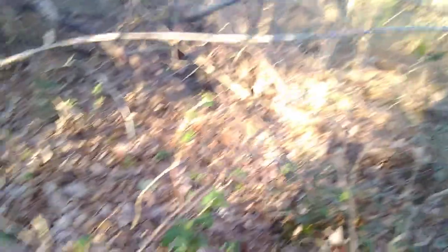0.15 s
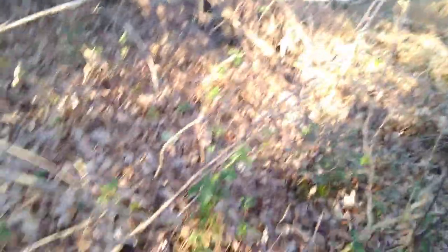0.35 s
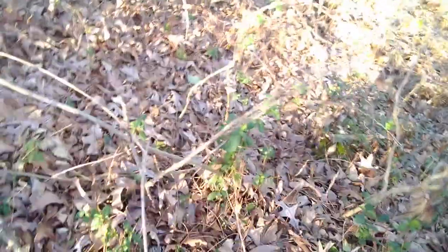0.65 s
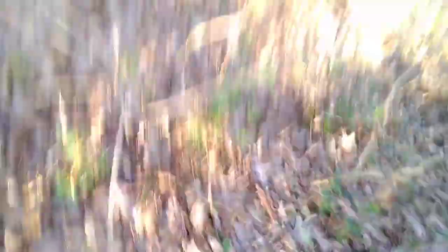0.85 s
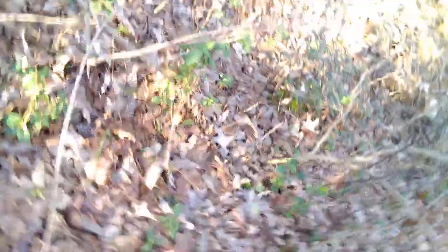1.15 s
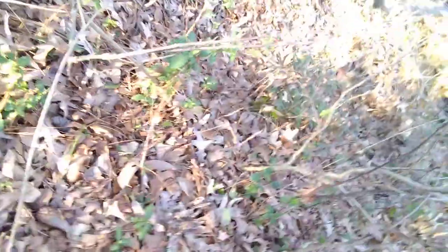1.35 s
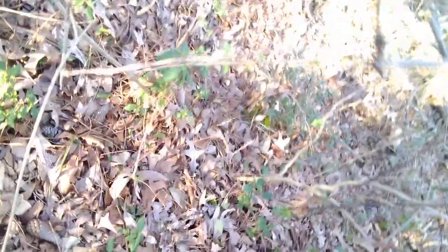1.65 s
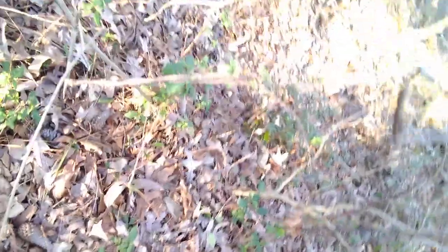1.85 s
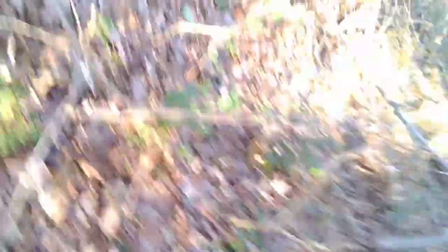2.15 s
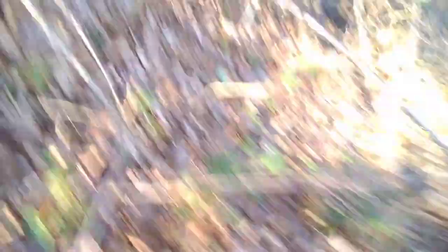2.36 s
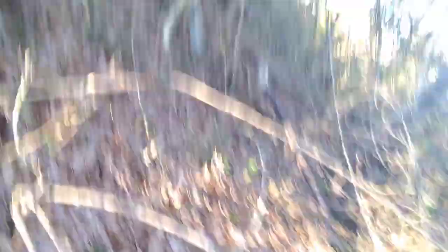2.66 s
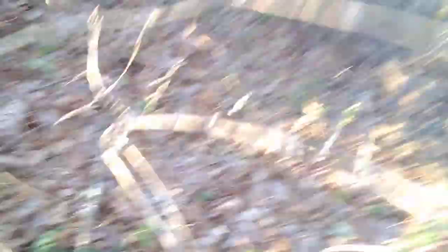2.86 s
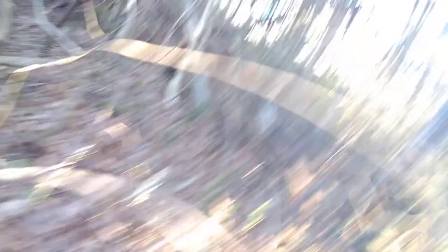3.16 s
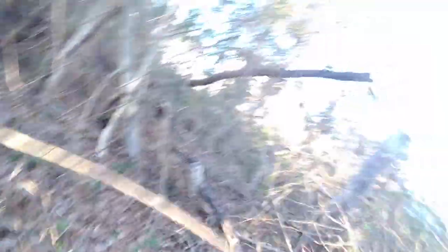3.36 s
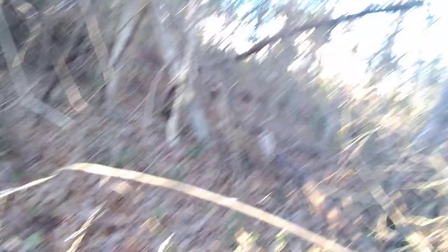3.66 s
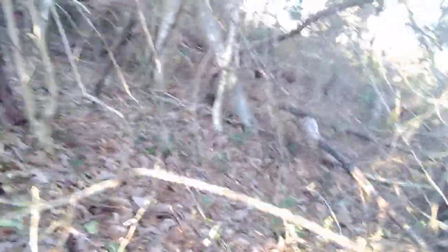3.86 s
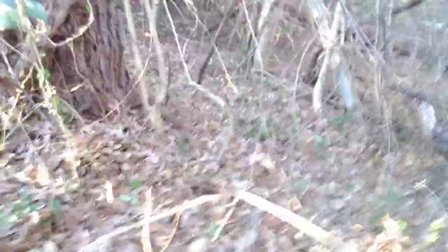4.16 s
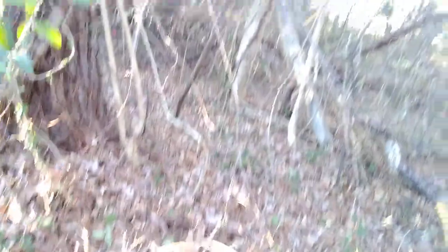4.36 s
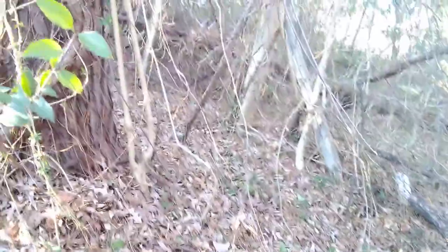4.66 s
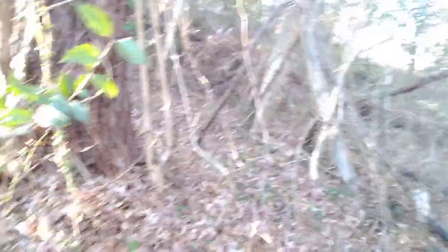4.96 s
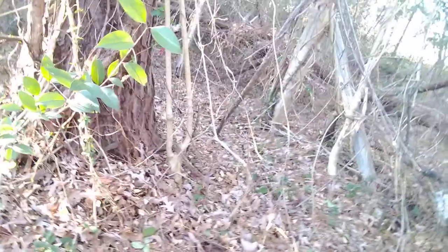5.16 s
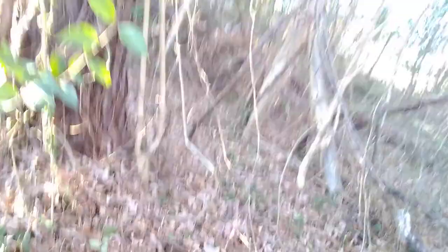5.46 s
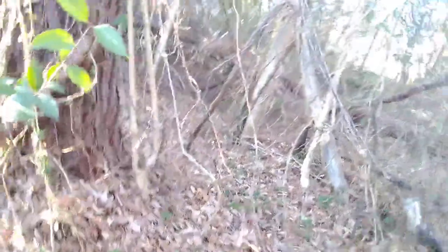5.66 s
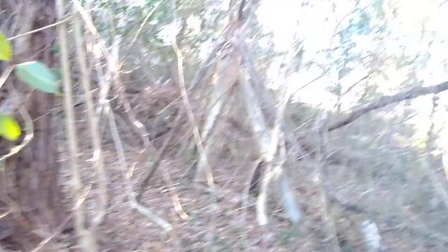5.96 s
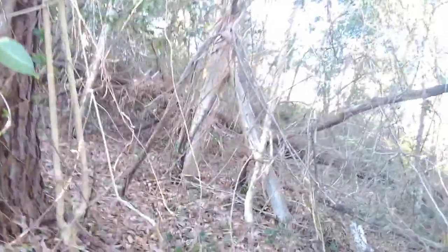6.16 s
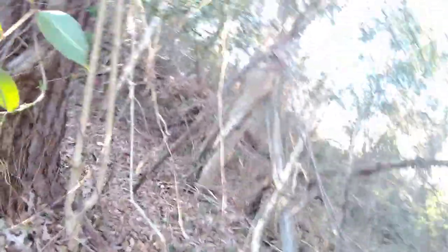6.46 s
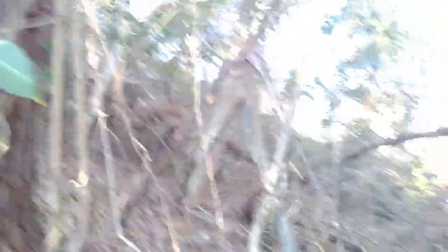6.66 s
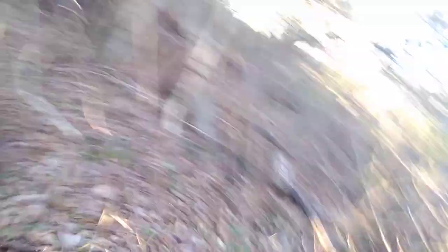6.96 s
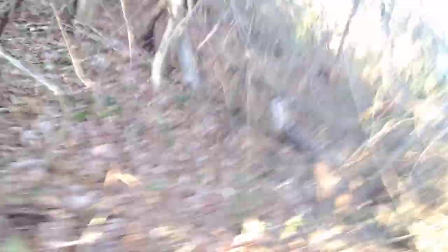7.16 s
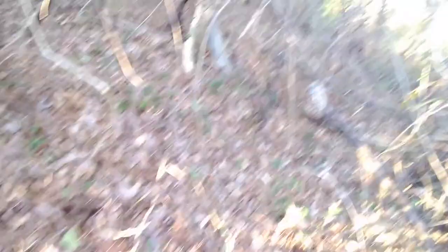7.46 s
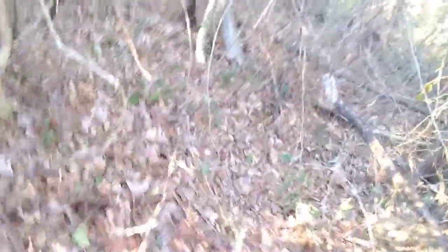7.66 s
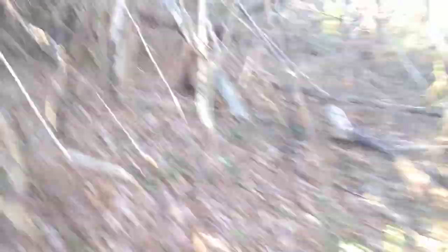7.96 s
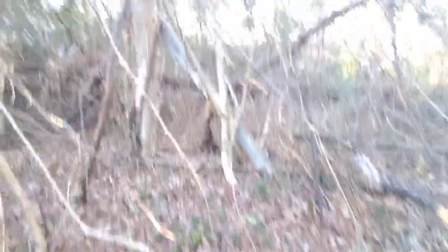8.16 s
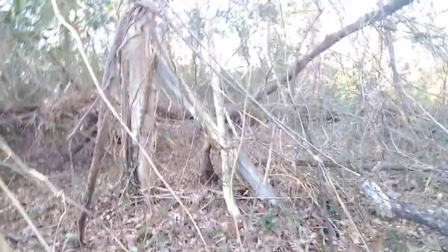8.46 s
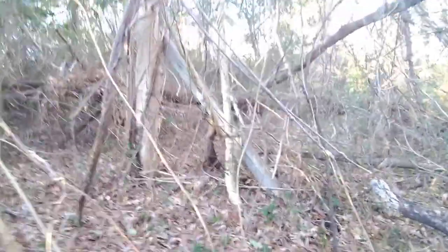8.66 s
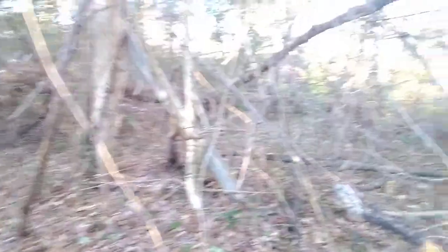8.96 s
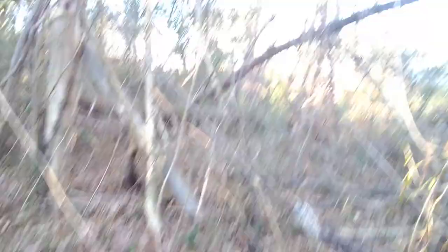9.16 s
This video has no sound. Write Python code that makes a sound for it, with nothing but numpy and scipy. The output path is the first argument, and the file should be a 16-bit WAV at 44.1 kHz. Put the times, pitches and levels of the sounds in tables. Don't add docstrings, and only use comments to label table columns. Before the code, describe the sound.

Close, bright leaf-litter rustle and crunching steps, snapping twigs and stalks, a few hollow handling knocks, a quieter pause midway, distant machine drone beneath.

```python
import sys
import numpy as np
from scipy import signal
from scipy.fft import rfft, irfft, next_fast_len
from scipy.io import wavfile
from scipy.ndimage import map_coordinates

SR = 44100
rng = np.random.default_rng(int(sys.argv[2]) if len(sys.argv) > 2 else 0)


def to_wav(s):
    ch = np.atleast_2d(s).T
    pcm = np.round(np.clip(ch, -1, 1) * 32767)
    wavfile.write(sys.argv[1], SR, pcm.astype(np.int16))


def volts_from_decibels(level):
    exponent = np.asarray(level, float) / 20
    return 10 ** exponent


N = 411012

# (time [s], first order [dB], third order [dB])
HUM = [(0.0, -44, -79), (0.9, -49, -68.5), (1.5, -54.5, -77), (2.02, -54.5, -91), (2.2, -47.5, -62.5),
       (3.68, -48, -51), (4.38, -53, -56), (4.75, -51.5, -47), (5.42, -49.5, -57.5), (6.02, -52, -54),
       (6.39, -83, -64.5), (7.01, -69.5, -69), (7.15, -46, -52), (7.32, -60.5, -75), (7.7, -70, -96),
       (8.2, -71.5, -67), (8.36, -52.5, -59.5), (9.32, -62, -58)]
# (frequency [Hz], level [dB])
RUMBLE = [(15, -39), (30, 1.5), (60, 0), (110, 1), (200, -7), (400, -10), (1500, -16), (16000, -69)]
# (time [s], peak [dB], body re peak [dB], boom [Hz], left-right [dB])
KNOCKS = [(0.182, -19, -17.5, 279, 1), (0.9613, -3.5, -11, 320, 22), (0.97, -7, -30, 338, 20),
          (1.0053, -24.5, 0, 285, 13), (1.0147, -28, -2, 320, 8), (1.0242, -9.5, -11.5, 239, 14),
          (4.1844, -19, -16.5, 272, -6.5), (7.074, -6, -17, 167, 22), (7.1469, -7.5, -10, 161.3, 19),
          (7.755, -25, -52, 132, -2), (8.004, -33.5, -21, 249, 4), (8.2662, -43, 2.5, 150, -15),
          (9.0242, -38, 2, 247, 4)]
# (frequency [Hz], level [dB], t60 [s])
TAP = [(1300, 5.5, 0.0021), (1885, 4, 0.0035), (3600, 0.5, 0.0012), (6060, -0.5, 0.0016),
       (11000, 6.5, 0.00072)]
# (frequency [Hz], level [dB], t60 [s])
SHELL = [(355, -5.5, 0.027), (438, -8, 0.045), (585, -12, 0.028), (820, 10.5, 0.012)]
# (time [s], peak [dB], centre [Hz], left-right [dB])
TWIGS = [(.0498, -12, 9150, 9), (.0868, -15, 11400, 9), (.1008, -3, 10200, 5), (.246, -8, 7200, 0.5),
         (.434, -14.5, 9100, 9), (.9064, -10.5, 9700, -1), (1.1671, -11, 8000, 2),
         (1.6989, -13.5, 11050, -27), (1.7477, -8, 10550, 17), (1.9273, -17, 13600, -8),
         (2.2102, -14, 13200, 2), (2.2267, -9, 9900, 0.5), (2.3484, -22, 11000, -10.5),
         (2.6607, -15, 9300, -12), (2.6662, -7.5, 9400, 0.5), (2.7979, -17, 9170, 12),
         (2.9156, -12.5, 10120, 5), (3.3731, -2.5, 11100, 4.5), (3.5232, -16, 12060, -6),
         (3.6255, -3, 9600, 10), (3.9172, -11, 9900, -11), (5.6763, -12.5, 11200, -7),
         (5.8853, -19, 10400, -4), (6.4688, -11.5, 11000, -2.5), (6.5024, -13.5, 12000, -6),
         (6.5259, -18.5, 11500, -15), (6.5793, -15, 13500, -4), (8.3462, -8, 12000, 6),
         (8.4744, -10, 12100, 3), (8.6425, -9.5, 10000, -2)]
# (time [s], peak [dB], left-right [dB])
STEMS = [(0.661, -24.5, 0), (.6789, -25, -6), (1.149, -16.5, 10), (1.949, -18, -8), (3.0408, -23, -30),
         (3.2213, -31.5, -4.5), (3.458, -17, 1), (3.9038, -27.5, -6), (5.651, -27, -1), (5.768, -24, -4),
         (5.828, -19, 1), (6.1953, -22, -6), (6.6016, -18, -6), (6.6192, -20.5, -4), (6.718, -20, -6),
         (6.789, -28.5, -26), (6.873, -20.5, -10), (7.513, -38, -22), (7.5425, -25, -13), (7.573, -30, 9),
         (7.6313, -26, 7), (7.773, -24.5, -6), (8.1092, -25, 4), (8.3981, -27.5, -3), (8.5168, -15, 2)]
# (time [s], peak [dB], centre [Hz], left-right [dB])
STALKS = [(.018, -19, 5500, -3), (.3077, -17, 3080, 18), (.3658, -6, 2950, 15), (.3704, -30, 5770, 1),
          (.624, -22.5, 6060, 4), (.8038, -16, 4900, 20), (.9068, -20, 2410, 21), (.9285, -18.5, 5900, 1),
          (1.0424, -31, 2490, 15), (1.2744, -14, 5700, -0.5), (2.0415, -17.5, 6370, -6),
          (2.1448, -28, 6330, -12), (2.2353, -21, 3330, -2), (3.4788, -21.5, 4630, 10),
          (3.5234, -17, 5070, 0), (3.6304, -14.5, 8000, 8), (3.6344, -16, 5100, -26),
          (3.9165, -15, 3200, 7), (5.1575, -28, 3150, 2), (5.9307, -20, 4800, -3),
          (6.2071, -16.5, 5200, -1), (6.3338, -21, 5800, 1.5), (6.3887, -22.5, 5430, -6),
          (6.4697, -17, 4430, 1), (7.6934, -35, 4020, -4), (9.305, -24.5, 4730, 7)]
# (time [s], peak [dB], centre [Hz], left-right [dB])
STICKS = [(.169, -19.5, 12800, 2.5), (.3366, -16, 9100, -1), (.358, -13, 7300, 2.5), (.39, -17.5, 3300, -7),
          (1.0638, -20.5, 5570, 4), (2.3998, -16, 8900, -3.5), (2.4716, -18, 10100, -4),
          (2.6158, -17.5, 10100, -3.5), (2.751, -21, 7440, -1), (3.1705, -24, 5660, -10),
          (4.1857, -7, 3130, 8.5), (6.2685, -22, 12400, -4), (6.9998, -23, 5360, -1),
          (8.1604, -34, 5280, 3), (8.2165, -21.5, 5930, 2), (8.4245, -26, 5380, 1), (8.436, -16, 7700, 4),
          (8.667, -16.5, 6540, 2), (9.1082, -16, 9900, 3)]
# (time [s], peak [dB], left-right [dB])
POCKETS = [(0.134, -13.5, 8), (0.228, -27, -4), (0.7508, -23, -8), (0.8045, -17, -13), (0.893, -21, 3),
           (1.1293, -33, -11), (1.1434, -15.5, -10), (1.2564, -17, 2), (1.264, -15, -5), (1.269, -12, -18),
           (1.3965, -24, -2), (1.4511, -20.5, 0), (1.4928, -19.5, -6), (1.5861, -30, -16),
           (1.6536, -27, -19), (2.2398, -7, -7), (2.3496, -23, -18), (2.622, -12, 10), (2.6272, -16, -13),
           (2.7118, -18, -5), (2.76, -16, -8), (2.8917, -17, -6), (2.9398, -15.5, -3), (2.987, -21, -6),
           (2.998, -16.5, -22), (3.0584, -36.5, 3), (3.174, -29, -4), (3.223, -25, -7), (3.5182, -18, -6),
           (3.548, -15.5, -6), (3.6034, -28, 2), (3.6906, -22, -16), (3.721, -22, -16), (3.7808, -35, -23),
           (3.8346, -34.5, -20), (3.9123, -12, -11), (4.4427, -30, 6), (4.4553, -29, -11),
           (4.5035, -20, -6.5), (4.5347, -24, -13), (4.7898, -31, -11), (4.8992, -29, -5), (4.905, -25, -8),
           (4.9575, -34, -11), (4.9766, -28.5, 2), (4.997, -34, -8), (5.012, -32, -8), (5.0913, -34, -1),
           (5.269, -34.5, -11), (5.3386, -34, -16), (5.4856, -44, -6), (5.515, -36, -8), (5.542, -28, -20),
           (5.6051, -30, -3), (5.6438, -28, -2.5), (5.6546, -24, -9), (5.795, -22, -3),
           (5.843, -18.5, -6), (5.9135, -25, -6), (5.933, -13.5, -6), (5.9709, -19, -4),
                 (5.983, -23, -9), (6.007, -21, -8), (6.0407, -26, -8), (6.097, -25, -7), (6.1437, -21, -7),
                 (6.1684, -19, -7), (6.2184, -14.5, -4), (6.2927, -18, -6), (6.3335, -27, -1),
                 (6.4076, -22.5, -2), (6.4501, -27, -3), (6.4585, -21, 0), (6.724, -21.5, 0),
                 (6.741, -25, -3), (6.912, -22, -4), (6.923, -17.5, -13), (6.964, -18, -5),
                 (7.156, -14.5, 11), (7.246, -19.5, -2), (7.3036, -24, 3), (7.4926, -31, -14),
                 (7.574, -27, -14), (7.6412, -27, -14), (7.6936, -32, -5), (7.7174, -29, -11),
                 (7.7221, -32, -14), (7.7984, -28, -9), (7.8073, -28, -16), (7.8306, -28, -10),
                 (7.851, -30, -5), (7.8645, -28, -14), (7.9639, -29, -28), (7.978, -31.5, -23),
                 (7.9998, -33, -21), (8.0741, -34, -12), (8.1442, -33, -7), (8.231, -10.5, 1),
                 (8.3204, -18, -3), (8.35, -12.5, -9), (8.3777, -24, -4), (8.3871, -29, -8),
                 (8.649, -15, -2), (8.723, -19, -7), (8.774, -21, -9), (8.8282, -16, 5), (8.8663, -20, -8),
                 (8.9293, -28, -3), (8.9622, -19, -5), (8.987, -21.5, 2), (9.0613, -23, 2),
                 (9.1647, -23.5, 8), (9.2173, -35, 1), (9.2548, -31, 8), (9.3048, -24, 5),
           (0.3708, -7.5, -13), (0.4573, -21, -14), (0.5894, -37, -15), (0.6439, -35, -8),
                    (0.7399, -24, -2), (0.8156, -20, -1), (0.9179, -29, -5), (1.0796, -22, 14),
                    (1.3482, -29, -8), (2.0746, -15, -4), (2.1808, -17, -15), (2.284, -15, -16),
                    (2.2965, -17, -10), (2.36, -18, -17), (2.4388, -24, -19), (2.6784, -17, -10),
                    (2.7049, -16, 2), (2.7456, -20, -5), (2.9622, -15.5, -7), (3.3507, -30, -8),
                    (3.4376, -16, -4), (3.5334, -21, 0), (3.6626, -24, -7), (5.8586, -17, -10),
                    (5.8733, -20, -5), (5.888, -13, -5), (5.9489, -13.5, -5), (6.2307, -19, -9),
                    (6.2689, -20.5, -14), (6.346, -17, -12), (6.5333, -17, -16), (6.5693, -14.5, -3),
                    (6.9421, -23, -6), (7.444, -19, -15), (7.5153, -29, -20), (7.7142, -32, -14),
                    (7.8442, -30, -7), (8.0274, -39, -11), (8.0547, -42, -16), (8.1598, -30, -3),
                    (8.3985, -20, -5), (8.6756, -15, -9)]
# (time [s], rustle [dB])
STIR = [(0, -30), (.27, -48), (.58, -73), (1.05, -52), (1.6, -51), (1.92, -35.5), (2.2, -31.5), (2.54, -34),
        (3.05, -42), (3.7, -42), (4.0, -36), (4.3, -46), (4.66, -59), (5.24, -76), (5.47, -76), (5.9, -40),
        (6.8, -47), (8.05, -72), (9.32, -61)]
# (time [s], rustle [dB], settling [s per 10 dB], weight [dB])
STEPS = [(0.0, -31.5, 0.21, -16), (.1, -30, 0.0553, -12), (0.361, -29.5, 0.1045, -15.5),
         (1.168, -33, 0.18, -15.5), (1.266, -25, 0, -25), (1.713, -30, 0.06, -18),
         (2.232, -22.5, -0.0341, -21.5), (2.621, -24, 0.0243, -16), (2.8, -23.5, 0.0464, -18),
         (2.93, -34, -0.03, -16.5), (3.168, -34, 0.0452, -13), (3.376, -27.5, 0.0466, -20),
         (3.92, -30.5, -0.02, -19), (4.509, -42, -0.3, -17), (5.545, -49.5, 0, -16), (5.94, -37, 0.26, -15),
         (6.53, -33.5, 0.15, -15), (6.88, -39.5, 0.5, -13), (8.231, -28.5, 0.12, -16),
         (8.44, -29.5, 0.28, -17.5), (8.64, -30, 0.27, -24), (9.114, -32, 0.045, -14),
         (9.31, -42.5, -2, -13)]
# (lift time [s], rustle [dB], swell [s per 10 dB], weight [dB])
SWEEPS = [(.88, -33, 0.12, -15.5), (1.502, -38, -0.06, -16.5), (3.6, -43, 0, -11), (4.18, -32.5, 0.16, -12),
          (5.2, -58, 0.5, -14), (5.39, -56.5, 0.5, -17), (5.69, -41.5, -0.13, -38),
          (5.88, -40, -0.13, -30.5), (6.333, -35.5, 0.0656, -12), (7.14, -35, 0.04, -17),
          (7.446, -35.5, 0.33, -16), (7.98, -53, 0.66, -6.5), (8.2, -57, -0.7, -4.5),
          (8.355, -30.5, 0.0144, -15.5), (8.93, -36, 0.2, -14.5), (9.09, -37, 0.2, -10.5)]
# (time [s], left-right [dB], delay of the left port [samples])
HEADING = [(0, 3.5, 2.57), (.7, 2.5, 11.5), (1.7, -6, 15), (2.7, 0, 7), (3.7, -1.5, 12), (4.2, -2, 11.5),
           (4.7, -2, 14.5), (6, -1, 8.5), (7.2, 3, 8), (7.7, 6.5, 3.5), (8.2, 1, 0.13), (9.32, 5.5, 0.053)]
LEAF_HZ = [700, 1400, 2600, 4200, 6200, 8500, 11000, 14000]
# (frequency [Hz], level [dB])
CRISP = [(900, -30), (2000, -15.5), (3400, -6), (10200, -1), (12900, -4), (15500, -12), (15900, -2.5),
         (16500, -54)]
# (frequency [Hz], level [dB])
BODY = [(200, -5), (330, 2), (500, 2.5), (1000, 1.5), (2000, -0.5), (3000, -2), (5000, -8)]
# (frequency [Hz], left-right [dB])
PORTS = [(60, -1), (150, 0.5), (1000, -2), (3000, 2.5), (8000, -3), (16000, -12)]
# (frequency [Hz], level [dB])
MIC = [(15, -11), (45, -4), (15300, 1.5), (15900, -21), (16800, -76)]

HUM_HZ = 80.03
RUMBLE_DB, RUMBLE_FIRST, RUMBLE_THIRD = -63, 0.46, 0.15
CHIRP_S, CHIRP_LENGTH_S, CHIRP_FROM_HZ, CHIRP_TO_HZ, CHIRP_DB = 5.238, 0.026, 5800, 8000, -56.5
THUD_S, THUD_DB, THUD_HZ, THUD_HOLD_S, THUD_T60_S = 8.26, -40.5, 150, 0.04, 0.13
BOOM_DB, BOOM_DB_PER_OCTAVE = -17, -8
OVERTONE, OVERTONE_DB = 2.9, -4.5
STEM_HZ = 10600
TWIG_CRACK_DB, STEM_CRACK_DB, STALK_CRACK_DB, STICK_CRACK_DB = -34.5, -19.5, -61.5, -12.5
POCKET_RISE_S, POCKET_T60_S = 0.00074, 0.012
LAND_S, LIFT_S = 0.038, 0.029
SOLE_SLOWER, STIR_WEIGHT_DB = 1.72, -16.5
CALM_DB = -57


def along(points, hz):
    f, v = np.transpose(points)
    return np.interp(np.log(hz + 1), np.log(f + 1), v)


def curves(rows):
    s, *cols = np.transpose(rows)
    return [np.interp(np.arange(N) / SR, s, c) for c in cols]


def unit(x):
    return x / np.sqrt(np.mean(x ** 2) + 1e-20)


def wobble(rate):
    knots = rng.standard_normal(int(N * rate / SR) + 4)
    return map_coordinates(knots, [np.arange(N) * rate / SR])


def filtered(x, response):
    m = next_fast_len(N + 8192)
    return irfft(rfft(x, m) * response(np.fft.rfftfreq(m, 1 / SR)), m)[..., :N]


def peak(f, centre_hz, q):
    w = centre_hz / q
    return 1j * f * w / (centre_hz ** 2 - f ** 2 + 1j * f * w)


def thin(corner_hz):
    return lambda f: (1j * f / (corner_hz + 1j * f)) ** 2


def sides(pan_db):
    pair = volts_from_decibels(np.array([pan_db / 2, -pan_db / 2]))
    return pair / np.sqrt(np.mean(pair ** 2, 0))


def add(track, s, sound, pan_db):
    late = np.interp(s, *np.transpose(HEADING)[[0, 2]])
    for row, gain, delay in zip(track, sides(pan_db), (late, 0)):
        row[int(round(s * SR + delay)):][:len(sound)] += gain * sound


def hum():
    first_db, third_db = curves(HUM)
    rumble_db = RUMBLE_DB + RUMBLE_FIRST * (first_db - first_db.mean())
    rumble_db = rumble_db + RUMBLE_THIRD * (third_db - third_db.mean())
    turn = 2 * np.pi * np.cumsum(HUM_HZ * (1 + 0.00785 * wobble(2.8))) / SR
    low_gain = volts_from_decibels(first_db + 4 + 1.56 * wobble(3.506) + 1.2 * wobble(9))
    low = low_gain * (np.sin(turn) + volts_from_decibels(-22) * np.sin(2 * turn))
    upper = volts_from_decibels(-13) * np.sin(2 * turn + 1) + np.sin(3 * turn)
    upper = upper + volts_from_decibels(-18) * np.sin(4 * turn) + volts_from_decibels(-11) * np.sin(5 * turn)
    common, left, right = rng.standard_normal((3, N))
    air = filtered(common + np.array([left, right]), lambda f: [[1], [1]] * volts_from_decibels(along(RUMBLE, f)))
    low = low * sides(3.1 * wobble(1.33))
    upper = upper * volts_from_decibels(third_db + 1.5 + 1.2 * wobble(3.32))
    return low + upper + volts_from_decibels(rumble_db + 4.5) * unit(air)


def bird():
    u = np.clip((np.arange(N) / SR - CHIRP_S) / CHIRP_LENGTH_S, 0, 1)
    hz = CHIRP_FROM_HZ + (CHIRP_TO_HZ - CHIRP_FROM_HZ) * (1 - (1 - u) ** 4)
    swell = np.sqrt(abs(np.sin(np.pi * u))) * (u < 1)
    return volts_from_decibels(CHIRP_DB) * swell * np.sin(2 * np.pi * np.cumsum(hz) / SR)


def trunks(x):
    t = np.arange(SR // 8) / SR
    tail = rng.standard_normal((2, len(t))) * volts_from_decibels(-60 * t / 0.025) * (t > 0.001)
    return signal.fftconvolve(x, tail / np.linalg.norm(tail[0]), axes=1)[:, :N]


def grip():
    t = np.arange(N) / SR - THUD_S
    shape = np.clip(t / 0.004, 0, 1) * volts_from_decibels(-60 * np.clip(t - THUD_HOLD_S, 0, 1) / THUD_T60_S)
    gain = volts_from_decibels(THUD_DB + 2.2 * wobble(60)) * shape
    tone = np.sin(2 * np.pi * THUD_HZ * t + wobble(39.4))
    scuff = 0.81 * volts_from_decibels(-60 * abs(t) / 0.11) * wobble(600)
    return gain * (tone + scuff)


def ring(modes, t):
    total = np.zeros(len(t))
    for k, (hz, db, t60) in enumerate(modes):
        decay = volts_from_decibels(db + rng.normal(0, 1.5) - 60 * t / t60)
        total += (-1) ** k * decay * np.sin(2 * np.pi * hz * t)
    return total


def knocks():
    out, t = np.zeros((2, N + SR)), np.arange(SR // 3) / SR
    hollow = signal.butter(2, [90, 700], "band", fs=SR, output="sos")
    hard = signal.butter(1, 450, "high", fs=SR, output="sos")
    swell = 1 - np.exp(-t / 0.002)
    for s, db, shell_db, boom_hz, pan_db in KNOCKS:
        boom_db = 0.57 * shell_db + BOOM_DB + BOOM_DB_PER_OCTAVE * np.log2(boom_hz / 200)
        thud = 3.2 * signal.sosfilt(hollow, rng.standard_normal(len(t))) * volts_from_decibels(-60 * t / 0.046)
        tuning = boom_hz / 300
        shell = [(hz * tuning, level_db, t60 / tuning) for hz, level_db, t60 in SHELL]
        waver = 0.8 * map_coordinates(rng.standard_normal(16), [36 * t])
        boom = volts_from_decibels(-60 * t / 0.27 + waver) * np.sin(2 * np.pi * boom_hz * t)
        overtone = np.sin(2 * np.pi * OVERTONE * boom_hz * t)
        boom = boom + volts_from_decibels(OVERTONE_DB - 60 * t / 0.13 - waver) * overtone
        tap = signal.sosfilt(hard, ring(TAP, t))
        body = volts_from_decibels(shell_db + 2.5) * (ring(shell, t) + thud) + volts_from_decibels(boom_db) * boom
        add(out, s + 0.00066, volts_from_decibels(db) * (tap + swell * body), pan_db)
    return out[:, :N]


def twigs():
    out, t = np.zeros((2, N + SR)), np.arange(SR // 25) / SR
    dull = signal.butter(2, [500, 2500], "band", fs=SR, output="sos")
    stems = [(s, db, STEM_HZ, pan_db) for s, db, pan_db in STEMS]
    kinds = [(TWIGS, TWIG_CRACK_DB), (stems, STEM_CRACK_DB), (STALKS, STALK_CRACK_DB), (STICKS, STICK_CRACK_DB)]
    for rows, crack_db in kinds:
        for s, db, hz, pan_db in rows:
            noise = rng.standard_normal((2, len(t)))
            click = np.sin(2 * np.pi * hz * t) * volts_from_decibels(-60 * t / 0.002)
            around = signal.butter(1, [hz * 0.56, min(hz * 2.13, 19000)], "band", fs=SR, output="sos")
            fray = 0.72 * volts_from_decibels(-60 * t / 0.004) + 0.041 * volts_from_decibels(-60 * t / 0.0086)
            splinter = signal.sosfilt(around, noise[0] * fray)
            crack = 3 * signal.sosfilt(dull, noise[1] * volts_from_decibels(-60 * t / 0.0075))
            add(out, s + 0.0003, volts_from_decibels(db + 3.5) * (click + splinter + volts_from_decibels(crack_db) * crack), pan_db)
    return filtered(out[:, :N], thin(400))


def pockets():
    out, t = np.zeros((2, N + SR)), np.arange(SR // 30) / SR
    shape = (1 - np.exp(-t / POCKET_RISE_S)) * volts_from_decibels(-60 * t / POCKET_T60_S)
    crisp = signal.butter(1, [2600, 15000], "band", fs=SR, output="sos")
    for s, db, pan_db in POCKETS:
        burst = signal.sosfilt(crisp, shape * rng.standard_normal(len(t)))
        add(out, s - 0.0004, volts_from_decibels(db + 1) * burst, pan_db)
    return filtered(out[:, :N], thin(900))


def footwork():
    t = np.arange(0, N, 32) / SR
    stir_db = curves(STIR)[0][::32]
    moves = [(s, db, LAND_S, fall, weight_db) for s, db, fall, weight_db in STEPS]
    moves += [(s, db, rise, LIFT_S, weight_db) for s, db, rise, weight_db in SWEEPS]
    rustle, sole = volts_from_decibels(2 * stir_db), volts_from_decibels(2 * (stir_db + STIR_WEIGHT_DB))
    for s, db, rise, fall, weight_db in moves:
        loss_db = 10 * np.where(t < s, (s - t) / abs(rise), (t - s) / abs(fall))
        rustle = rustle + volts_from_decibels(2 * (db - loss_db))
        sole = sole + volts_from_decibels(2 * (db + weight_db - loss_db / SOLE_SLOWER))
    return [np.interp(np.arange(N) / SR, t, np.sqrt(power)) for power in (rustle, sole)]


def collapses(count, spread_db, life):
    jumps = volts_from_decibels(spread_db * rng.exponential(size=count).clip(0, 3))
    starts = np.bincount(rng.integers(N, size=count), jumps, N)
    settle, rise = np.exp(-1 / (life * SR)), np.exp(-1 / (0.0006 * SR))
    return unit(signal.lfilter([1], np.convolve([1, -settle], [1, -rise]), starts))


def crackle(clumps, lag, count, spread_db, scatter, q):
    share = np.cumsum(clumps)
    at = np.searchsorted(share / share[-1], rng.random(count)).clip(0, N - 1)
    size = volts_from_decibels(spread_db * rng.exponential(size=count).clip(0, 3.2)) * rng.choice([-1, 1], count)
    late = np.round(lag[at] + scatter * rng.standard_normal(count)).astype(int)
    gains = sides(3 * rng.standard_normal(count))
    kind = rng.integers(len(LEAF_HZ), size=count)
    m = next_fast_len(N + 8192)
    f = np.fft.rfftfreq(m, 1 / SR)
    total, power = 0, 1e-9
    for k, hz in enumerate(LEAF_HZ):
        own, mode = kind == k, peak(f, hz, q)
        ticks = [np.bincount(np.clip(at + d, 0, N)[own], (size * g)[own], m) for d, g in zip((late, 0), gains)]
        total = total + rfft(ticks) * mode
        power = power + abs(mode) ** 2
    return irfft(total / np.sqrt(power), m)[:, :N]


def leaves():
    rustle, sole = footwork()
    pan_db, lag = curves(HEADING)
    clumps = 1.7 + collapses(count=1800, spread_db=2.4, life=0.0015)
    lumps = 0.2 * clumps + collapses(count=900, spread_db=6, life=0.021)
    common, left, right = rng.standard_normal((3, N))
    later = common[(np.arange(N) - lag).astype(int).clip(0, N - 1)]
    swish = 0.7 * np.array([later, common]) + 0.95 * np.array([left, right])
    grains = unit(crackle(clumps ** 2, lag, count=8000, spread_db=3, scatter=3.5, q=2.2))
    breaking = rustle ** 2 / (rustle ** 2 + volts_from_decibels(2 * CALM_DB))
    broken = unit(grains + volts_from_decibels(4) * unit(clumps * swish))
    crunch = np.sqrt(breaking) * broken + np.sqrt(1 - breaking) * unit(swish)
    crisp = unit(filtered(crunch, lambda f: volts_from_decibels(along(CRISP, f)) * (f > CRISP[0][0])))
    pressed = grains + volts_from_decibels(3.5) * unit(lumps * swish)
    body = unit(filtered(pressed, lambda f: volts_from_decibels(along(BODY, f)) * (f > BODY[0][0])))
    flutter = volts_from_decibels(0.27 + 0.63 * wobble(7.5))
    return flutter * rustle * crisp * sides(pan_db) + volts_from_decibels(5) * sole * body


def scene():
    snaps, blows = twigs(), knocks()
    shock = abs(np.diff(blows, prepend=0)).max(0)
    jolt = signal.lfilter([0.002], [1, -np.exp(-1 / (0.0078 * SR))], shock)
    litter = leaves() / (1 + 1200 * jolt)
    background = hum() + bird() + volts_from_decibels(-4.5) * trunks(snaps)
    return background + grip() + blows + snaps + pockets() + litter


def low_pass(x):
    return signal.sosfilt(signal.butter(12, 16810, fs=SR, output="sos"), x)


def record(dry):
    ports = filtered(dry, lambda f: sides(along(PORTS, f)) * volts_from_decibels(along(MIC, f)))
    return low_pass(np.clip(ports, -1, 1))


dry = scene()
out = record(dry)
to_wav(out)
```